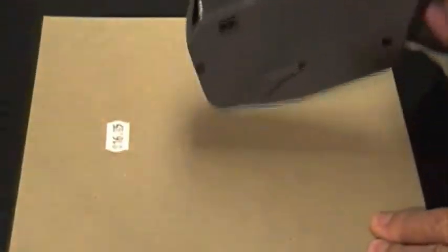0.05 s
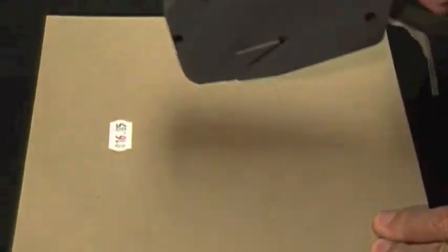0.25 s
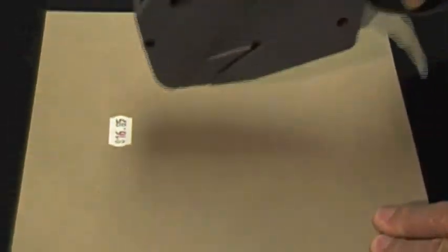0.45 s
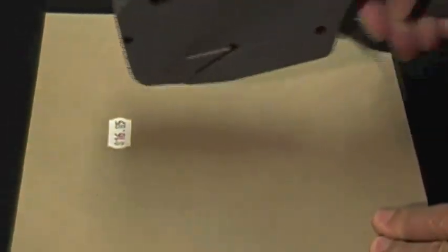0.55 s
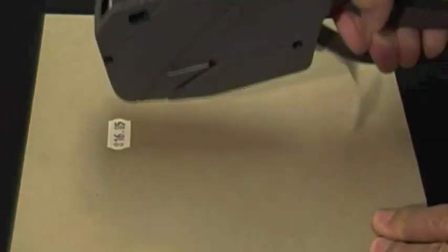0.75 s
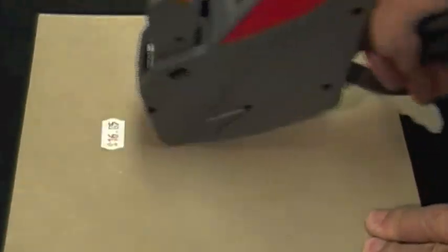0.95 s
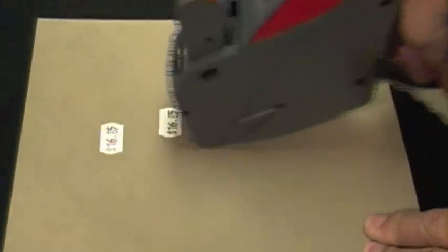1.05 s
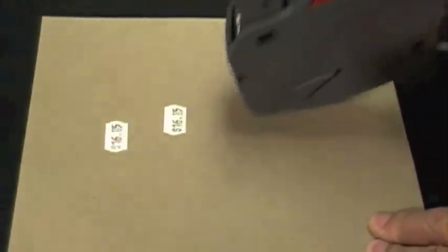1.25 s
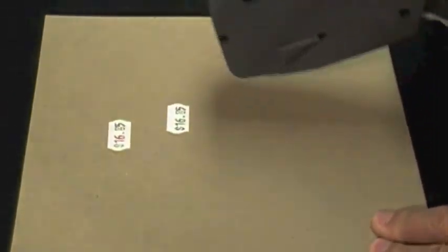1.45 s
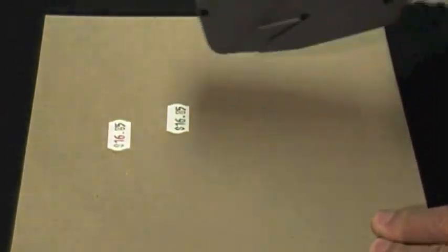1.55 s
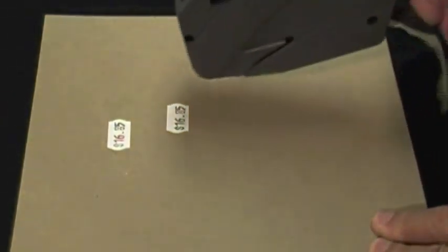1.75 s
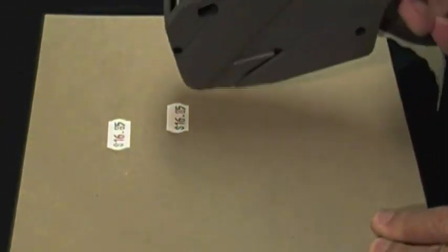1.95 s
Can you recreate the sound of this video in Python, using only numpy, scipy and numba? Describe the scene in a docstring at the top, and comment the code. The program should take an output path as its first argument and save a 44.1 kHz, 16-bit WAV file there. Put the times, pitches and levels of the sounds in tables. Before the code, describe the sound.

A handheld plastic label gun clicks sharply in squeeze-release pairs, knocking a label onto a card

```python
"""A plastic label gun worked indoors, close to a small camera's microphone, in a room that rings, over rumble, hum and hiss.
A squeeze, then a release: ratchet grains and noise snaps ring the shell; the release plucks a spring and the roll rattles.
A thin wavering sine whistles early on. Then paper ticks and rubs in noise, and the nose knocks the modes of a table
through a card and rolls over it. A second squeeze and release follow. The gain control ducks on loud peaks."""
import sys
import numpy as np
from scipy import signal
from scipy.fft import rfft, irfft
from scipy.io import wavfile
from scipy.ndimage import uniform_filter1d
from numba import njit

SR = 44100
rng = np.random.default_rng(int(sys.argv[2]) if len(sys.argv) > 2 else 0)


def linear_from_db(decibels):
    """Turn decibels (scalar or array-like) into linear amplitude factors; 0 gives 1."""
    return 10 ** (np.asarray(decibels, float) / 20)


def transcribe(signal):
    """Save signal, clipped to [-1, 1], as a 16-bit WAV file at the path in sys.argv[1]."""
    frames = np.atleast_2d(signal).T
    limited = np.clip(frames, -1, 1)
    pcm = np.round(limited * 32767).astype(np.int16)
    wavfile.write(sys.argv[1], SR, pcm)


N = 88861
LEAD = 8192  # samples rendered before time zero, so that the room is already ringing


def curve(points, hz):
    """Second column of a table, read on a log-frequency axis and level beyond its ends."""
    points = np.array(points, float)
    return np.interp(np.log(np.maximum(hz, 1)), np.log(points[:, 0]), points[:, 1])


def colour(x, points):
    """Filter by a table of f/Hz, level/dB."""
    n = x.shape[-1]
    gain = linear_from_db(curve(points, np.fft.rfftfreq(n, 1 / SR)))
    return irfft(rfft(x) * gain, n)


def band(x, hz, width_hz):
    """Two-pole band-pass."""
    b, a = signal.iirpeak(min(hz, .4 * SR), hz / width_hz, SR)
    return signal.lfilter(b, a, x)


def unit(x):
    """Scale to rms 1."""
    return x / np.sqrt(np.mean(x ** 2))


def add(out, s, x):
    """Mix x into out at time s."""
    i = int(s * SR) + LEAD
    out[i:i + len(x)] += x[:len(out) - i]


def decay(t, t60):
    """Exponential that falls 60 dB in t60 seconds."""
    return np.exp(-np.log(1000) * t / t60)


def ring(modes, phases=0):
    """Response of a solid body to a tap: a sum of decaying sines."""
    t = np.arange(SR // 2) / SR
    hz, db, t60 = np.array(modes, float).T[:, :, None]
    return np.sum(linear_from_db(db) * np.sin(2 * np.pi * hz * t + phases) * decay(t, t60), axis=0)


def bursts(events, wide):
    """Short noise cracks that swell and die, each around its own pitch.

    Row 0 is heard directly; row 1 is a smooth click of equal energy that the walls return.
    """
    out, t = np.zeros((2, N + LEAD)), np.arange(2048) / SR
    noises = rng.standard_normal((len(events), len(t)))
    for (s, db, hz, length), noise in zip(events, noises):
        swell = (t / length) ** 2 * np.exp(-t / length * 2.62)
        pair = np.array([noise * swell, t == 0])
        crack, click = band(band(pair, hz, wide * hz), hz, wide * hz)
        crack = linear_from_db(db) * crack / np.max(np.abs(crack))
        add(out[0], s, crack)
        add(out[1], s + length, unit(click) * np.sqrt(np.mean(crack ** 2)))
    return out


def background():
    """Low rumble of the house and hiss as shaped noise, with a deep sine hum; mid and side."""
    # spectrum of rumble and hiss: f/Hz, relative level/dB per Hz
    spectrum = [(12, -39), (20, 1), (37, -5), (54, -14.5), (92, -4.5), (123, -15), (166, -0.5),
                (228, -15.5), (360, -15.5), (390, -25.5), (568, -24), (1020, -31.5), (5980, -39.5),
                (12000, -35.5), (15600, -75), (22000, -120)]
    # width of the noise: f/Hz, side over mid level/dB
    noise_width = [(60, -11), (110, -18.5), (200, -17), (380, -14), (700, -7), (1290, -2), (2380, -2.5),
                   (4400, 0), (8120, -3), (15000, 1)]
    noise_db = -36.5  # rms of the mid
    hum_hz, hum_db = 28, -41.5  # rms in the mid
    mid, side = colour(rng.standard_normal((2, N + LEAD)), spectrum)
    noise = np.array([mid, colour(side, noise_width)]) / np.sqrt(np.mean(mid ** 2))
    phase = 2 * np.pi * hum_hz * np.arange(N + LEAD) / SR + rng.uniform(0, 2 * np.pi)
    hum = linear_from_db(hum_db) * np.sqrt(2) * np.sin(phase)
    return hum * np.array([[1], [.15]]) + linear_from_db(noise_db) * noise


def label_gun(t):
    """Snaps, ratchet and rattle grains ring the plastic shell; each release plucks the return spring."""
    # snaps of lever and pawls, and near 1 s the crack of the nose knocking the card: # t/s, peak level/dB
    # before shell, high-pass and gain control, f/Hz of the band, time scale/s of the swell
    snaps = [(-.10, 9, 2780, .003), (.3865, -21, 1530, 0.0017), (.402, -7, 2470, 0.00083),
             (.4150, 3.5, 3070, 0.0022), (.419, 15, 3400, 0.0023), (.4195, 17.5, 8100, 0.0017),
             (.428, 21, 2130, 0.0013), (.570, -25, 1460, .002), (.570, -19.5, 398, .004),
             (.595, 3.5, 2870, 0.0021), (.620, 9, 5830, 0.00083), (.623, -1, 3100, 0.0013),
             (.635, 5.5, 1840, 0.0012), (.664, -4, 1980, 0.00053), (.693, -8.5, 3240, 0.0031),
             (.9925, 11, 2210, 0.0019), (.997, -6.5, 1020, 0.00327), (1.013, -1, 1210, 0.0035),
             (1.110, -18, 1310, 0.00152), (1.5845, -12.5, 1400, 0.0016), (1.598, -4, 3750, 0.00043),
             (1.609, -21, 2930, 0.00034), (1.6135, 1, 2555, 0.00055), (1.615, 19, 2400, 0.002),
             (1.616, 13, 7460, 0.0013), (1.625, 12, 2960, 0.00073), (1.7895, -28, 3050, 0.00077),
             (1.7945, 0.5, 2230, 0.0015), (1.812, -16.5, 450, 0.0047), (1.822, 16, 3350, 0.00073),
             (1.825, 1, 3240, 0.0011), (1.8465, -0.5, 1940, 0.00093)]
    # ratchet rasps: start t/s, end t/s, start level/dB, end level/dB
    rasps = [(0.377, .416, -42, -8), (0.592, 0.626, -18.5, -5), (1.578, 1.628, -36.5, -1),
             (1.788, 1.823, -9, -16)]
    # label roll rattling on after a release: start t/s, end t/s, start level/dB, end level/dB, f/Hz
    rattles = [(0.637, 0.742, -24.5, -31, 1400), (1.819, 1.932, -19.5, -33, 1680)]
    # shell modes: f/Hz, relative level/dB, t60/s
    shell = [(1087, 1, 0.082), (1286, 6, 0.043), (1751, 1, 0.017), (2168, 10.5, 0.017), (2908, -2.5, 0.013),
             (3060, 5.5, 0.013), (3927, -3.5, 0.011), (5415, -9, 0.06), (6200, -7, 0.043),
             (8210, 13, 0.027)]
    # return spring modes: f/Hz, relative level/dB, t60/s
    spring = [(1055, -10, .35), (1257, -7, .3), (1301, 0, .75), (1700, -10, .3), (2085, -13, .4)]
    # spring plucks: t/s, level/dB
    plucks = [(0.6339, -24.5), (1.8275, -34)]
    grains_per_s, spread_db, rise_s = 9000, 3.3, 0.0045
    shell_db, low_hz = -46, 463  # the gun is too small to radiate below low_hz

    loudness = linear_from_db(spread_db * rng.exponential(size=len(t)))
    grains = (rng.random(len(t)) < grains_per_s / SR) * rng.standard_normal(len(t)) * loudness
    rasp_gain = np.zeros(len(t))
    for start, end, start_db, end_db in rasps:
        gate = np.clip((t - start) / rise_s, 0, 1) * (t < end)
        rasp_gain += gate * linear_from_db(np.interp(t, [start, end], [start_db, end_db]))
    push = bursts(snaps, 1.47) + rasp_gain * unit(band(grains, 3340, 4100))
    for start, end, start_db, end_db, hz in rattles:
        gate = (t > start) & (t < end)
        rattle = unit(band(band(grains, hz, 1.17 * hz), hz, 0.65 * hz))
        push = push + gate * linear_from_db(np.interp(t, [start, end], [start_db, end_db])) * rattle

    ringing = signal.fftconvolve(push, ring(shell)[None, :4096], axes=1)[:, :len(t)]
    out = push + linear_from_db(shell_db) * ringing
    for s, db in plucks:
        phases = rng.uniform(0, 2 * np.pi, (len(spring), 1))
        add(out[0], s, linear_from_db(db) * ring(spring, phases))  # direct sound only
    return signal.sosfilt(signal.butter(2, low_hz, "high", fs=SR, output="sos"), out)


def room(x):
    """Diffuse echo as decaying noise, each band with its own t60; mid and side from unrelated tails."""
    # decay of the room: f/Hz, t60/s
    room_t60 = [(150, 0.56), (600, 0.65), (1500, 0.31), (4000, 0.28), (8000, 0.34), (14000, 0.05)]
    # width of the echo: f/Hz, side over mid level/dB
    echo_width = [(60, 2), (200, -17), (400, -9.5), (1300, -17), (4400, -9), (8000, -3.5), (14000, 11)]
    echo_db, gap_s = -9.5, 0.003  # the echo swells in over gap_s
    early_db, early_t60_s = 3, .03  # denser start of the tail
    t, tails = np.arange(SR // 2) / SR, 0
    for hz in 100 * 2 ** np.arange(0, 7.6, .5):
        noise = band(rng.standard_normal((2, len(t))), hz, hz / 2)
        side_gain = linear_from_db(curve(echo_width, hz))
        tails = tails + noise * decay(t, curve(room_t60, hz)) * np.array([[1], [side_gain]])
    tails = tails * np.minimum(t / gap_s, 1) ** 2 * (1 + linear_from_db(early_db) * decay(t, early_t60_s))
    tails = tails / np.sqrt(np.sum(tails[0] ** 2))
    return linear_from_db(echo_db) * signal.fftconvolve(x[None], tails, axes=1)[:, :len(x)]


def whistle(t):
    """A thin faint whistle: one sine of wavering pitch and level."""
    # path of the whistle: t/s, f/Hz, rms level/dB
    path = [(.04, 6350, -80), (.08, 6420, -61), (.13, 6560, -59), (.2, 6400, -60), (.26, 6020, -61),
            (.29, 5950, -85)]
    s, hz, db = np.array(path).T
    level = linear_from_db(np.interp(t, s, db, left=-120, right=-120))
    phase = 2 * np.pi * np.cumsum(np.interp(t, s, hz)) / SR
    return level * np.sqrt(2) * np.sin(phase)


def paper(t):
    """Label paper ticks and crackles as noise bursts, over the grainy noise of the label rubbing on the card."""
    # ticks and crackles: t/s, peak level/dB, f/Hz of the band, time scale/s of the swell
    ticks = [(.077, -35.5, 1980, 0.0031), (.8625, -28, 6500, 0.0064), (.885, -28, 8300, 0.012),
             (.895, -34, 7100, 0.014), (.907, -54, 3960, 0.0081), (.926, -20.5, 7500, 0.0024),
             (.950, -29, 6300, 0.0058), (.973, -57, 8500, 0.0048), (.980, -20, 6300, 0.024),
             (1.125, -23.5, 8000, 0.0013), (1.208, -26.5, 8130, 0.0045), (1.222, -22, 2310, 0.0039),
             (1.245, -46, 4700, 0.0043), (1.2513, -12.5, 4630, 0.0014), (1.256, -49, 5030, 0.0092),
             (1.303, -27.5, 1680, 0.0019), (1.538, -34.5, 4500, 0.0016)]
    # rub on the card: t/s, level/dB
    rub = [(.84, -62), (.87, -45.5), (.99, -35), (1.15, -38.5), (1.2, -43), (1.26, -31), (1.33, -87)]
    grains = rng.standard_normal(len(t)) * linear_from_db(4.4 * rng.exponential(size=len(t)))
    rub_gain = linear_from_db(np.interp(t, *np.array(rub).T, left=-120, right=-120))
    return bursts(ticks, 0.84) + rub_gain * unit(band(grains, 3300, 5000))


def table_knock(t):
    """The nose of the gun knocks the table modes through the card; the roller rumbles over it."""
    # modes of the table under the card: f/Hz, relative level/dB, t60/s
    modes = [(78, -20, .3), (139, -8, .45), (170, -14, .3), (196, 0, .45), (248, -7, .22), (281, -8, .28),
             (320, -10, .18), (354, -7, .22), (405, 2, .09), (450, -5, .08), (640, -13, .1),
             (860, -13, .08), (1010, -6, .06), (1190, -7, .1)]
    # knocks: t/s, level/dB
    knocks = [(0.9941, -4), (1.016, -13), (1.106, -19.5)]
    contact_s = 0.00026
    roll_start_s, roll_end_s, roll_db = 1.0, 1.13, -47.5
    push, contact = np.zeros(len(t)), np.hanning(int(contact_s * SR) + 3)
    for s, db in knocks:
        add(push, s, linear_from_db(db) * contact / contact.sum())
    rolling = (t > roll_start_s) & (t < roll_end_s)
    push += linear_from_db(roll_db) * rolling * band(rng.standard_normal(len(t)), 296, 267)
    return signal.fftconvolve(push, ring(modes))[:len(t)]


def scene():
    """Gun, whistle, paper and table close to the microphone, with their echo, over the background."""
    near_side_db, table_echo_db = -20.5, -8
    t = (np.arange(N + LEAD) - LEAD) / SR
    noise_floor = background()
    direct, echoed = label_gun(t) + whistle(t) + paper(t)
    knock = table_knock(t)
    near = direct + knock
    # three samples of delay give the close sources a little width, mostly in the treble
    side = linear_from_db(near_side_db) * (near - np.roll(near, 3))
    echo = room(echoed + linear_from_db(table_echo_db) * knock)
    mid, side = np.array([near, side]) + echo + noise_floor
    return np.array([mid + side, mid - side])[:, LEAD:]


@njit
def follow(over, attack, hold, release):
    """Gain cut in dB: closes on the excess, holds, then recovers at a steady rate."""
    y, cut, wait = np.empty(len(over)), 0., 0.
    for i in range(len(over)):
        if over[i] > cut:
            cut, wait = cut + (over[i] - cut) * attack, hold
        wait -= 1
        if wait < 0:
            cut = max(cut - release, 0.)
        y[i] = cut
    return y


def top_cut(x):
    """Nothing passes above the cut-off."""
    return signal.sosfilt(signal.butter(12, 15970, fs=SR, output="sos"), x)


def record(dry):
    """The gain control ducks on loud peaks; what slips through saturates softly; the treble rolls off."""
    # response of the microphone: f/Hz, level/dB (flat below the first row)
    mic_response = [(6000, -6.5), (8000, -6.5), (10000, -10.5), (12500, -24.5), (14000, -38), (16000, -26)]
    threshold_db, squeeze = -3.5, 0.99  # squeeze: share of the excess dB that is taken off
    attack_s, hold_s, release_s = 0.0018, 0.049, 0.13  # release: time to recover 20 dB
    peak = uniform_filter1d(np.max(np.abs(dry), axis=0), size=9)
    over = np.clip(squeeze, 0, 1) * (20 * np.log10(peak + 1e-9) - threshold_db)
    cut = follow(over, 1 / (attack_s * SR), hold_s * SR, 20 / (release_s * SR))
    saturated = 1.607 * np.tanh(dry * linear_from_db(-cut))
    mix = np.clip(colour(saturated, mic_response), -1, 1)
    return top_cut(mix)


dry = scene()
out = record(dry)
transcribe(out)
```